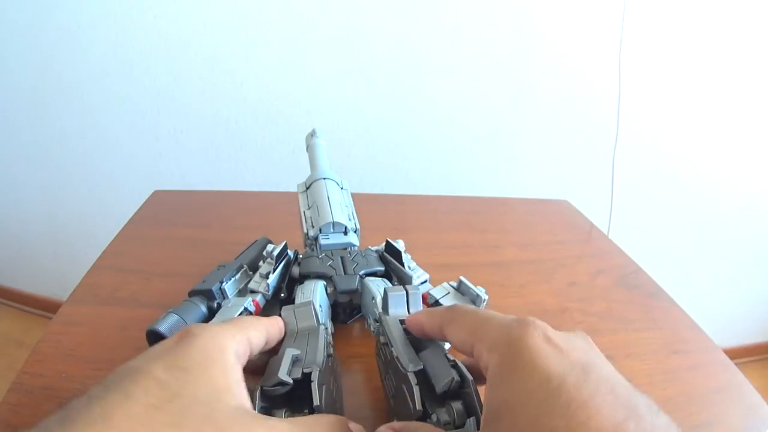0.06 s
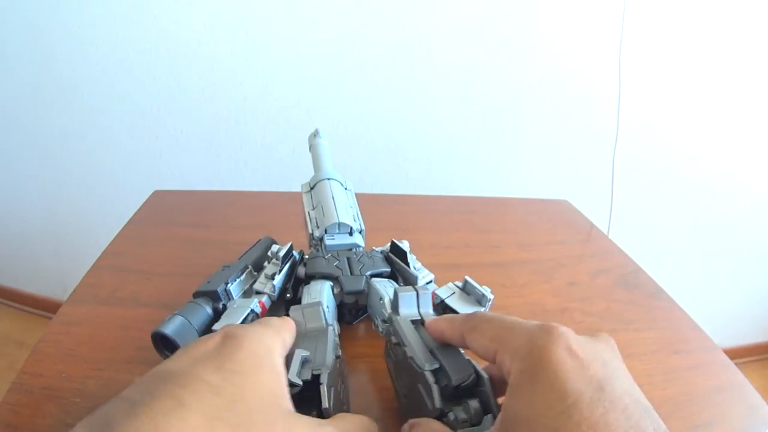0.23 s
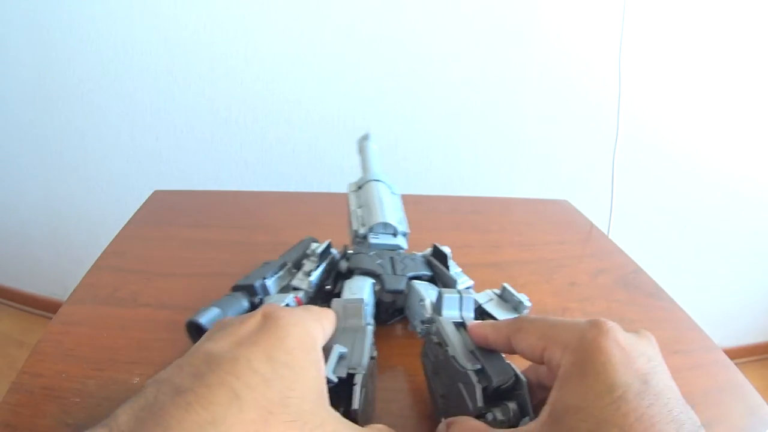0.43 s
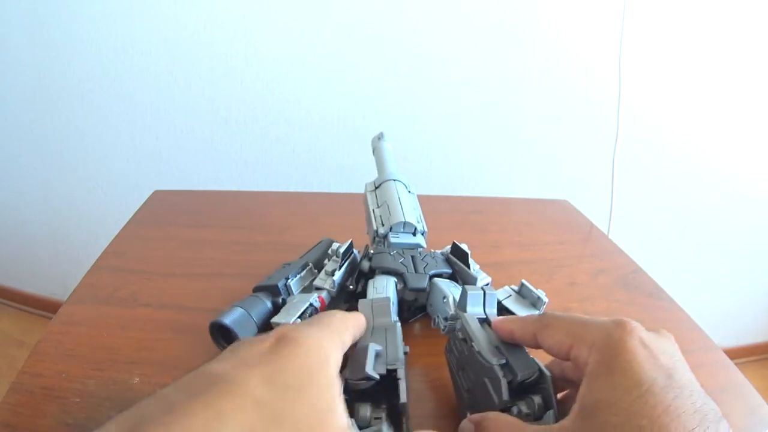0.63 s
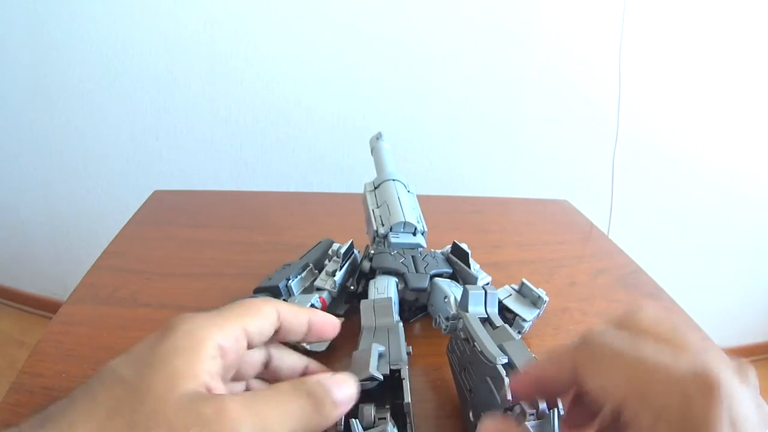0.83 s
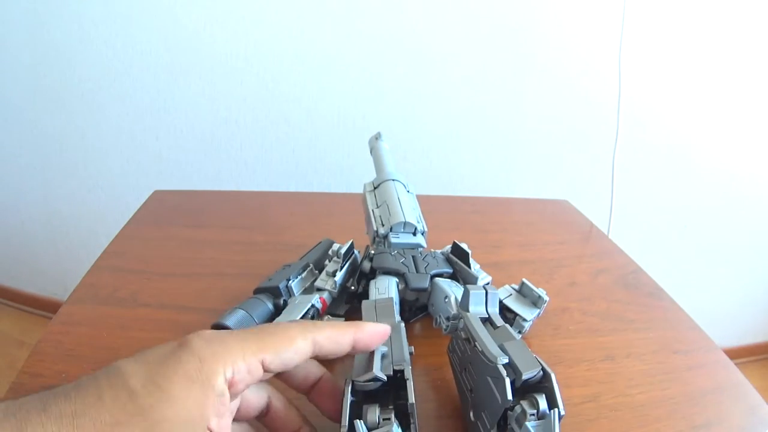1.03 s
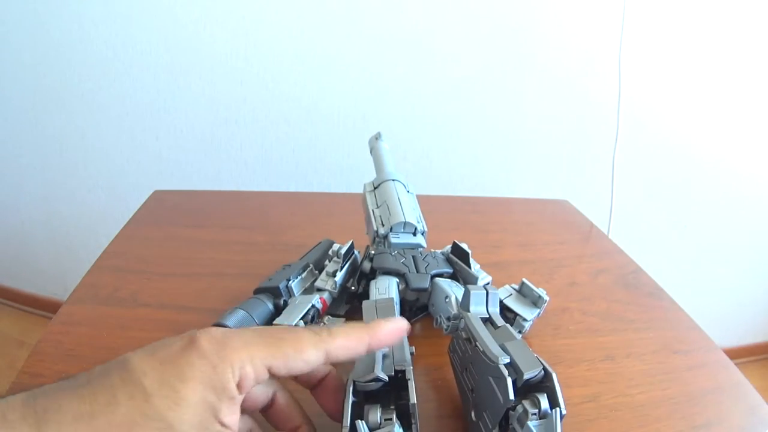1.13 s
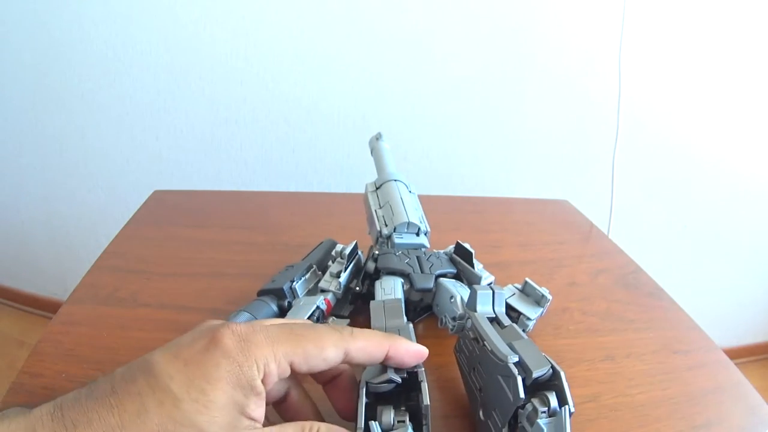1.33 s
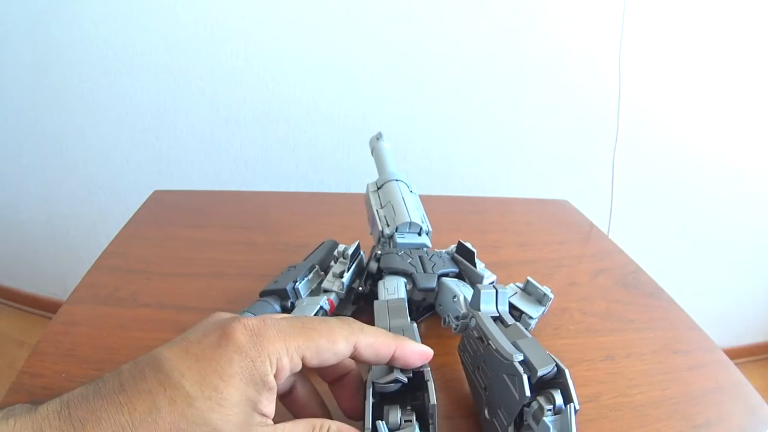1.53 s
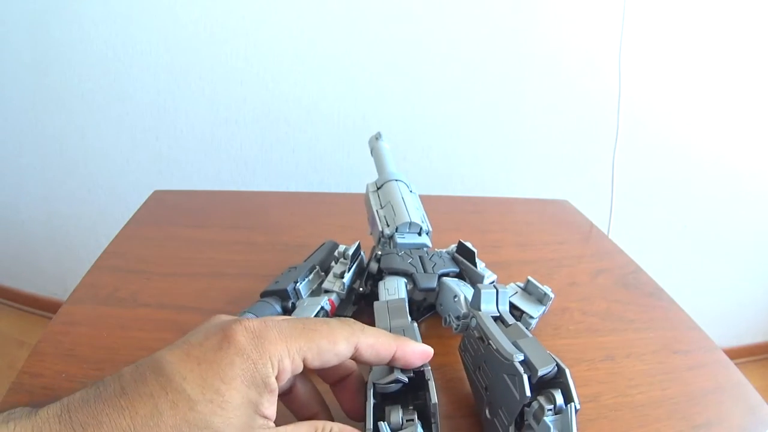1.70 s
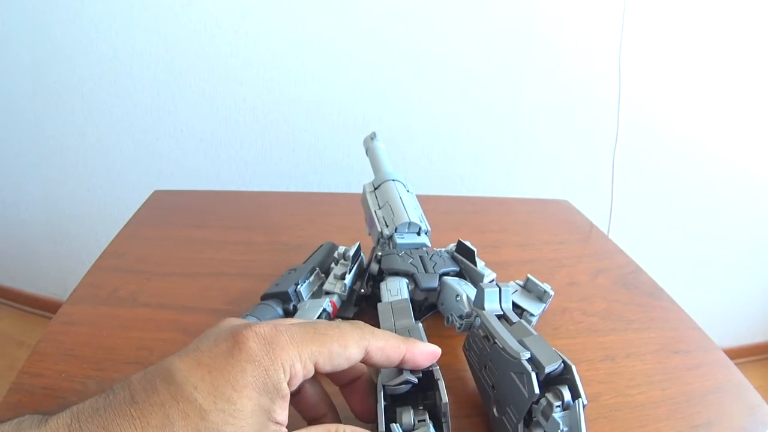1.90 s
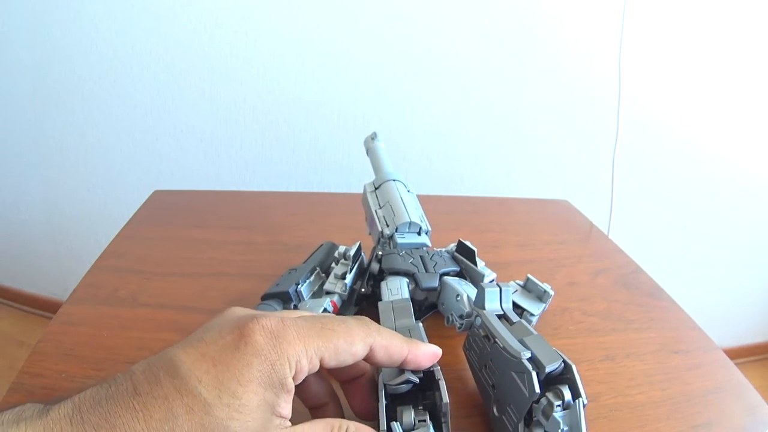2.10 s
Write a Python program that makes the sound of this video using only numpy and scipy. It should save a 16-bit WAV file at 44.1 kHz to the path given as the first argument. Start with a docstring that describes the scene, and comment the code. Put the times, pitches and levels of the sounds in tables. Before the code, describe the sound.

Hard plastic toy clicks and snaps as fingers pry and fold its parts on a table

```python
"""A low rumble and a soft scuff over quiet room noise, then bursts of snapping clicks, knocks and thumps:
fingers pry and fold a hard plastic toy on a wooden table, heard close up in a small room.
Clicks and rattles are short noise chatters that ring small parts or the hollow body; knocks and thumps
are smooth pushes on the body or table top. Gritty noise makes the sliding fingers and the shifting toy.
Fading noise makes the room's echo; shaped noise and a sine make the room noise and a faint low hum."""
import sys
import numpy as np
from scipy import signal
from scipy.fft import rfft, irfft
from scipy.io import wavfile
from scipy.ndimage import uniform_filter1d

SR = 44100
rng = np.random.default_rng(int(sys.argv[2]) if len(sys.argv) > 2 else 0)


def bounce(signal):
    """Save signal as a 16-bit WAV file at the path given by the first command-line argument."""
    frames = np.transpose(np.atleast_2d(signal))
    limited = np.clip(frames, -1, 1)
    pcm = np.round(limited * 32767).astype(np.int16)
    wavfile.write(sys.argv[1], SR, pcm)


def ratio(d):
    """dB to gain"""
    e = np.asarray(d, float) / 20
    return 10 ** e


N = 94815  # length in samples


def unit(x):
    """Scale to an rms (average strength) of 1."""
    return x / np.sqrt(np.mean(x ** 2))


def colour(x, points):
    """Shape the spectrum of noise by (pitch [Hz], level [dB]) points."""
    hz = np.fft.rfftfreq(len(x), 1 / SR) + 1  # the 1 avoids log(0)
    point_hz, point_db = np.array(points).T
    level_db = np.interp(np.log(hz), np.log(point_hz), point_db, left=-60)
    return irfft(rfft(x) * ratio(level_db), len(x))


def ring(modes, extra_db=0, detune=0, sense=0.83):
    """What a tap sets ringing: a sum of fading sines, one for each natural pitch (mode)."""
    t = np.arange(int(.3 * SR)) / SR
    hz, db, t60 = np.array(modes).T[:, :, None]
    # sense -1: neighbours swing opposite ways; between 0 and 1: each mode is scaled down more than the last
    sign = sense ** np.arange(len(modes))[:, None]
    swing = np.sin(2 * np.pi * hz * (1 + detune) * t)
    fade = 1000. ** (-t / t60)  # falls 60 dB in t60
    return np.sum(sign * ratio(db + extra_db) * swing * fade, axis=0)


def focus(modes, hz, depth_db):
    """A blow favours modes near hz: those far away (in octaves) lose up to depth_db."""
    octaves = np.log2(np.array(modes)[:, :1] / hz)
    return depth_db * (np.exp(-(octaves / 0.7) ** 2) - 1)


def strikes(rows, modes, gain_db, jitter, chatter, sense):
    """A smooth push or noisy chatter rings the modes; returns the direct sound and what feeds the room.
    Rows: (time [s], peak [dB] before gain_db, push or chatter time [ms], mode weights [dB])."""
    out = np.zeros((2, N + SR))
    t = np.arange(1024) / SR
    for s, db, ms, weights_db in rows:
        u = t * 1000 / max(ms, .05)
        if chatter:
            noise = rng.standard_normal(len(t))
            push = noise * abs(noise) * np.sqrt(u) * np.exp(-u - u ** 2)  # squaring makes it spiky
        else:
            push = u * np.exp(-u ** 2)
        detune = jitter * rng.standard_normal((len(modes), 1))
        h = ring(modes, weights_db, detune, sense)
        direct = signal.fftconvolve(push, h)
        direct = direct * ratio(db + gain_db) / np.max(abs(direct))
        around = direct
        if chatter:  # the room gets one smooth ring of equal energy
            around = h * np.sqrt(np.sum(direct ** 2) / np.sum(h ** 2))
        i = int(s * SR)
        out[0, i:i + len(direct)] -= direct
        out[1, i:i + len(around)] -= around
    return out[:, :N]


# snapping joints: (time [s], peak [dB] before CLICK_DB and the bass cut, favoured pitch [Hz], chatter [ms])
JOINT_CLICKS = [(0.2099, -29.5, 7100, 2.2), (0.2155, -30.5, 3750, 5.9), (0.2254, -24, 6900, 5.7),
                (0.23, -32.5, 2700, 3.5), (0.2338, -24.5, 4330, 1.9), (0.3074, -28, 1760, 2.2),
                (0.307, -22, 5800, 3.46), (0.3362, -19.5, 5700, 4.6), (0.341, -22.5, 7600, 2.6),
                (0.369, -27, 3700, 5.7), (0.3685, -24, 6800, 2.1), (.393, -24.5, 7500, 2.9),
                (.401, -28, 7400, 6.6), (0.4048, -24.5, 3840, 7.1), (0.4545, -32, 5900, 1.1),
                (1.2212, -36, 3500, 4.8), (1.2279, -24, 8600, 1), (1.231, -38, 4580, 2.7),
                (1.2483, -17, 6500, 2.49), (1.356, -34, 6030, 4.6), (1.3807, -32, 6040, 4.3),
                (1.4277, -29.5, 4070, 6.3), (1.678, -49, 2420, 5.7), (1.7318, -28.5, 6900, 3.5),
                (1.811, -42.5, 3400, 13), (1.825, -27, 7260, 5), (1.9675, -43, 3760, 4.3),
                (2.0162, -32, 4860, 3.4), (2.0537, -38, 2800, 1), (2.0712, -40.5, 3150, 1.2),
                (2.1137, -30.5, 6170, 3.7)]
# soft scuffs of a part in its socket: (time [s], peak [dB] before CLICK_DB and the bass cut,
# favoured pitch [Hz])
SOCKET_SCUFFS = [(0.1217, -43, 2164), (0.5635, -42, 3400), (0.635, -38.5, 3600), (0.683, -36, 2280)]
# natural pitches of the small parts: (pitch [Hz], level [dB])
PART_PITCHES = [(1400, -6.5), (1900, -2.5), (2700, -0.5), (3300, -2.5), (3800, -0.5), (4600, -2), (5400, 1),
                (6100, 1), (6800, 2), (7500, 6), (8300, 4), (9300, -4), (10100, -2.5), (10800, 4.5)]
CLICK_DB, CLICK_FOCUS_DB = 1, 11
SCUFF_MS, SCUFF_FOCUS_DB = 3.46, 20.5
PART_CYCLES = 19  # swings in which a part fades by 60 dB
CLICK_LOW_HZ = 1070  # bass cut


def clicks():
    """Joints snap and parts scuff: short chatters ring the small, quickly fading parts."""
    modes = [(hz, db, PART_CYCLES / hz) for hz, db in PART_PITCHES]
    rows = [(s, db, ms, focus(modes, hz, CLICK_FOCUS_DB)) for s, db, hz, ms in JOINT_CLICKS]
    rows += [(s, db, SCUFF_MS, focus(modes, hz, SCUFF_FOCUS_DB)) for s, db, hz in SOCKET_SCUFFS]
    y = strikes(rows, modes, CLICK_DB, jitter=.04, chatter=True, sense=-1.)
    return signal.sosfilt(signal.butter(2, CLICK_LOW_HZ, "high", fs=SR, output="sos"), y)


# knocks on the hollow body: (time [s], peak [dB], favoured pitch [Hz])
BODY_KNOCKS = [(0.3889, -10.5, 1480), (0.3909, -19.5, 2040), (0.4389, -16.5, 1190)]
# natural pitches of the hollow body: (pitch [Hz], level [dB], time to fade 60 dB [s])
BODY_PITCHES = [(388, -9, .05), (470, -9, .04), (600, -8, .04), (710, -4, .04), (815, -3, .05),
                (1000, -3, .05), (1250, -2, .03), (1420, 0, .03), (1740, -3, .03), (2030, -3, .03),
                (2500, -8, .02)]
KNOCK_FOCUS_DB = 8
KNOCK_CYCLES = .17  # contact time, in swings of the favoured pitch


def knocks():
    """Parts knock the hollow body: one smooth push each, shorter for a higher pitch."""
    rows = [(s, db, KNOCK_CYCLES * 1000 / hz, focus(BODY_PITCHES, hz, KNOCK_FOCUS_DB))
            for s, db, hz in BODY_KNOCKS]
    return strikes(rows, BODY_PITCHES, 0, jitter=.03, chatter=False, sense=1.)


# loose parts against the body: (time [s], peak [dB], favoured pitch [Hz])
LOOSE_RATTLES = [(0.3984, -25, 1100), (.405, -24, 770), (.424, -41, 1100), (.447, -35, 1420),
                 (.459, -28.5, 880), (.472, -34.5, 1050), (.677, -43.5, 710), (1.2295, -41.5, 716),
                 (1.429, -32.5, 1680), (1.432, -33, 646), (1.478, -40.5, 810), (1.736, -44.5, 1570),
                 (1.816, -35, 510), (1.827, -41.5, 1310), (1.942, -45.5, 595)]
RATTLE_MS, RATTLE_FOCUS_DB = 1.93, 23.5


def rattles():
    """Loose parts rattle: short noisy chatters ring the hollow body."""
    rows = [(s, db, RATTLE_MS, focus(BODY_PITCHES, hz, RATTLE_FOCUS_DB)) for s, db, hz in LOOSE_RATTLES]
    return strikes(rows, BODY_PITCHES, 0, jitter=.04, chatter=True, sense=-1.)


# blows on the table: (time [s], peak [dB] before THUMP_DB, favoured pitch [Hz])
TABLE_THUMPS = [(0.23, -27, 156), (0.299, -31.5, 224), (0.388, -23.5, 247), (0.442, -21, 248),
                (0.509, -29, 250), (0.65, -31, 230.6), (0.748, -40.5, 225), (1.236, -31.5, 171),
                (1.428, -17, 149), (1.434, -25.5, 345), (1.8168, -26.5, 356), (1.8325, -27, 173),
                (1.887, -35, 100)]
# natural pitches of the table top: (pitch [Hz], level [dB], time to fade 60 dB [s])
TABLE_PITCHES = [(57.4, -46, 0.29), (96.3, -11, 0.27), (118.3, -1, 0.29), (175.1, 4.5, 0.19),
                 (228.85, 4, 0.27), (352, -7, 0.059)]
THUMP_DB, THUMP_MS, THUMP_FOCUS_DB = -4.5, 0.54, 11.5


def thumps():
    """The table top thumps: brief pushes ring its low pitches, direct sound only."""
    rows = [(s, db, THUMP_MS, focus(TABLE_PITCHES, hz, THUMP_FOCUS_DB)) for s, db, hz in TABLE_THUMPS]
    return strikes(rows, TABLE_PITCHES, THUMP_DB, jitter=.01, chatter=False, sense=-1.)[0]


def grit():
    """Rough contact: noise whose strength jumps at random from sample to sample."""
    return rng.standard_normal(N) * ratio(1.5 * rng.exponential(size=N))


# fingers sliding on plastic: (time [s], level [dB])
SLIDE_LEVEL = [(0, -62), (.15, -66.5), (.3, -56.5), (.39, -42), (.48, -53), (.55, -59.5), (.63, -53),
               (.7, -61), (.73, -74.5), (1.03, -64), (1.12, -71.5), (1.22, -62.5), (1.6, -70),
               (2.15, -66.5)]
# tone of skin on plastic: (pitch [Hz], level [dB])
RUB_TONE = [(1000, 1.5), (2000, 2), (3500, 3), (6000, -6), (8000, -4), (11000, -13)]
RUB_PATCH_DB, RUB_PATCH_MS = 2.5, 8


def sliding():
    """Fingers rub the plastic: gritty noise that swells and fades in small patches."""
    k = int(RUB_PATCH_MS * SR / 1000)
    patch = uniform_filter1d(rng.standard_normal(N), k) * np.sqrt(k)
    rub = unit(colour(grit() * ratio(RUB_PATCH_DB * patch), RUB_TONE))
    return rub * ratio(np.interp(np.arange(N) / SR, *np.array(SLIDE_LEVEL).T))


# toy shifting under the hands: (time [s], table rumble level [dB], body drag level [dB])
SHIFT_LEVELS = [(0.0, -47.5, -70.5), (0.23, -47.5, -56.5), (0.39, -35, -49.5), (0.55, -45.5, -54),
                (0.72, -52, -62), (0.99, -64, -90), (1.45, -44, -53.5), (1.65, -55, -75.5),
                (2.15, -48.5, -64.5)]


def shifting():
    """The toy drags along the table: gritty contact keeps the body and the table top ringing."""
    times, rumble_db, drag_db = np.array(SHIFT_LEVELS).T
    t = np.arange(N) / SR
    drag = unit(signal.fftconvolve(grit(), ring(BODY_PITCHES))[:N])
    rumble = unit(signal.fftconvolve(grit(), ring(TABLE_PITCHES))[:N])
    return drag * ratio(np.interp(t, times, drag_db)), rumble * ratio(np.interp(t, times, rumble_db))


# how long the room rings: (pitch [Hz], time to fade 60 dB [s])
ROOM_FADE = [(150, 0.33), (800, 0.32), (2100, 0.38), (5500, 0.14), (11000, 0.13)]
ROOM_DB, ROOM_WIDE, ROOM_BUILD_S = -12.5, 0.57, .008


def room(x):
    """Many overlapping echoes: fading noise in octave bands, the high treble dying first."""
    n = int(.6 * SR)
    t = np.arange(n) / SR
    fade_hz, fade_s = np.array(ROOM_FADE).T
    build = 1 - np.exp(-(t / ROOM_BUILD_S) ** 2)
    tails = 0
    for hz in 125 * 2 ** np.arange(7):
        sos = signal.butter(2, [hz / np.sqrt(2), hz * np.sqrt(2)], "band", fs=SR, output="sos")
        t60 = np.interp(np.log(hz), np.log(fade_hz), fade_s)
        band = signal.sosfilt(sos, rng.standard_normal((2, n)))
        tails = tails + band * 1000. ** (-t / t60) * build
    tails = tails / np.sqrt(np.sum(tails[0] ** 2))
    mid, side = signal.fftconvolve(x[None], tails, axes=1)[:, :N]
    return ratio(ROOM_DB) * np.array([mid + ROOM_WIDE * side, mid - ROOM_WIDE * side])


# tone of the room noise: (pitch [Hz], level [dB])
AIR_TONE = [(15, -64), (25, -0.5), (118, -0.5), (480, -17.5), (573, -16.5), (685, -18.5), (4070, -32.5),
            (11000, -48.5), (14300, -72), (22000, -120)]
AIR_DB, AIR_WIDE_HZ = -52.5, 350  # left and right differ mostly above AIR_WIDE_HZ
HUM_HZ, HUM_DB = 112.7, -64


def air():
    """Room noise is shaped noise, wider above the bass; the hum is one steady sine."""
    mid, side = (unit(colour(rng.standard_normal(N), AIR_TONE)) * ratio(AIR_DB) for _ in range(2))
    side = signal.sosfilt(signal.butter(2, AIR_WIDE_HZ, "high", fs=SR, output="sos"), side)
    hum = ratio(HUM_DB) * np.sqrt(2) * np.sin(2 * np.pi * HUM_HZ * np.arange(N) / SR)
    return np.array([mid + side, mid - side]) + hum


def scene():
    """The toy and table in the middle, the room all around."""
    drag, rumble = shifting()
    direct, around = clicks() + knocks() + rattles() + sliding() + drag
    return direct + thumps() + rumble + room(around) + air()


def top_cut(x):
    """Nothing passes above the cut-off."""
    return signal.sosfilt(signal.butter(12, 12370, fs=SR, output="sos"), x)


def record(dry):
    """Filters cut the top above 11 kHz and the lowest bass below 56.3 Hz."""
    mix = signal.sosfilt(signal.ellip(6, 1, 23, 11000, fs=SR, output="sos"), dry)
    mix = signal.sosfilt(signal.butter(4, 56.3, "high", fs=SR, output="sos"), mix)
    return top_cut(mix)


dry = scene()
out = record(dry)
bounce(out)
```